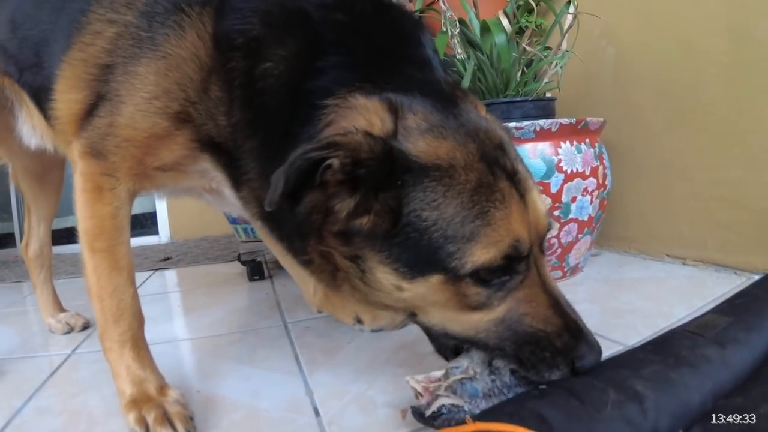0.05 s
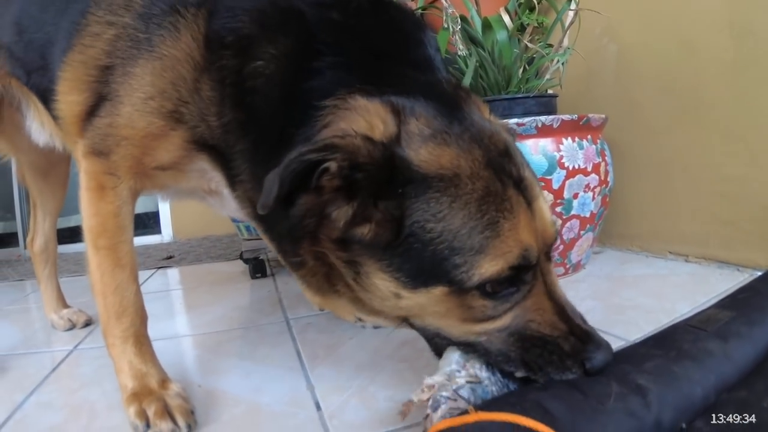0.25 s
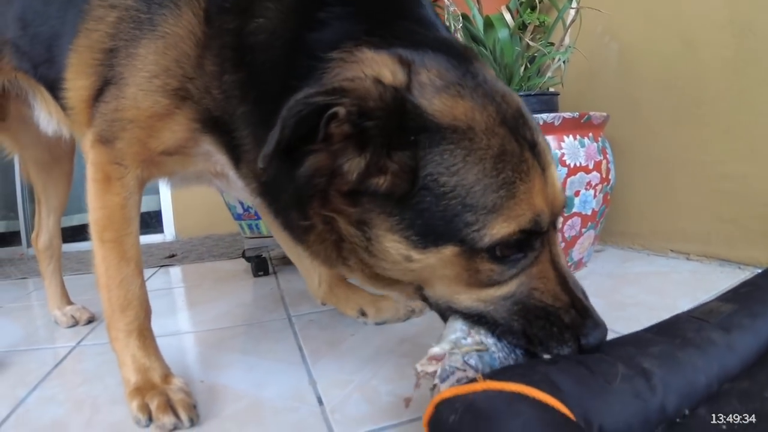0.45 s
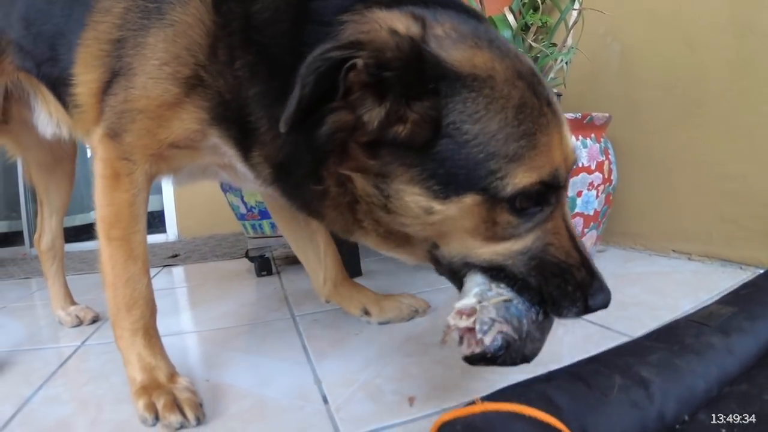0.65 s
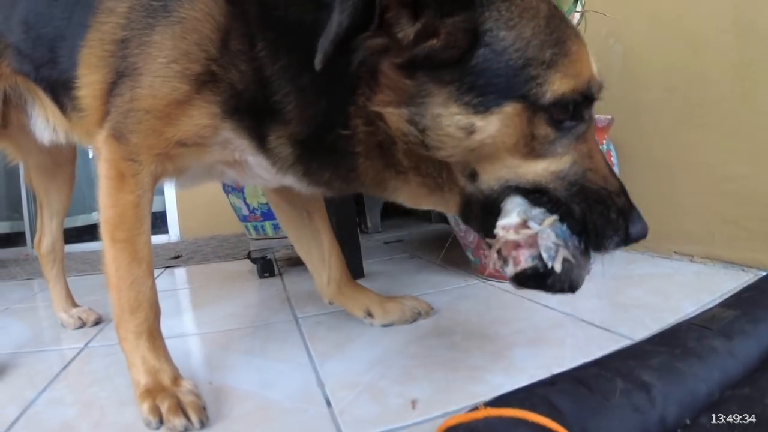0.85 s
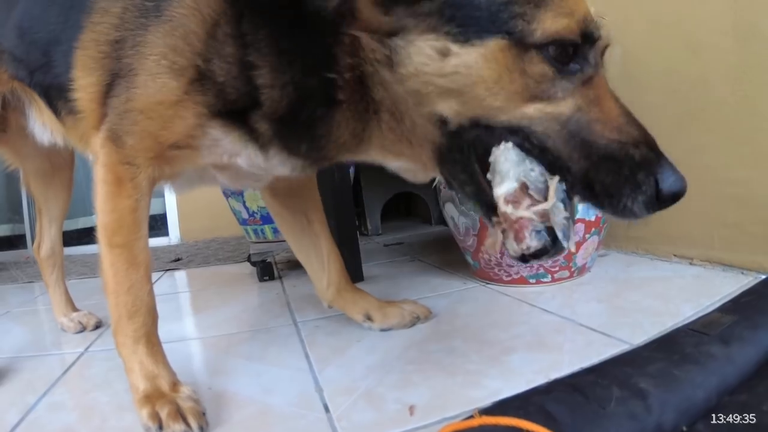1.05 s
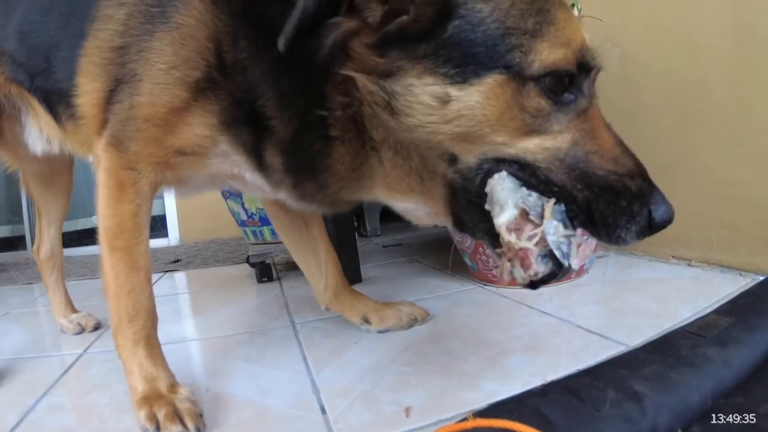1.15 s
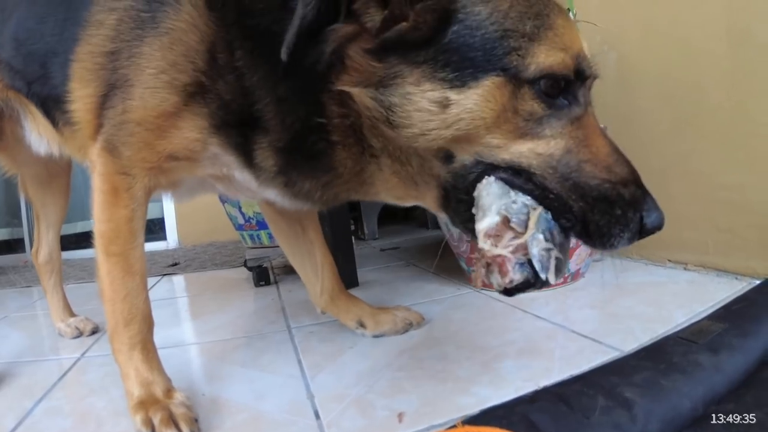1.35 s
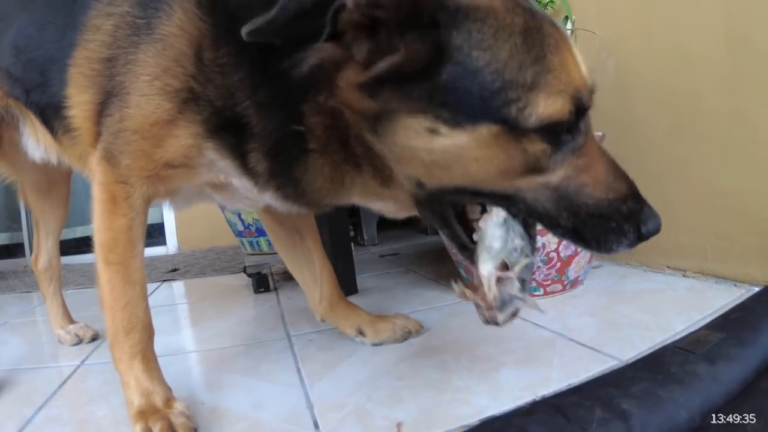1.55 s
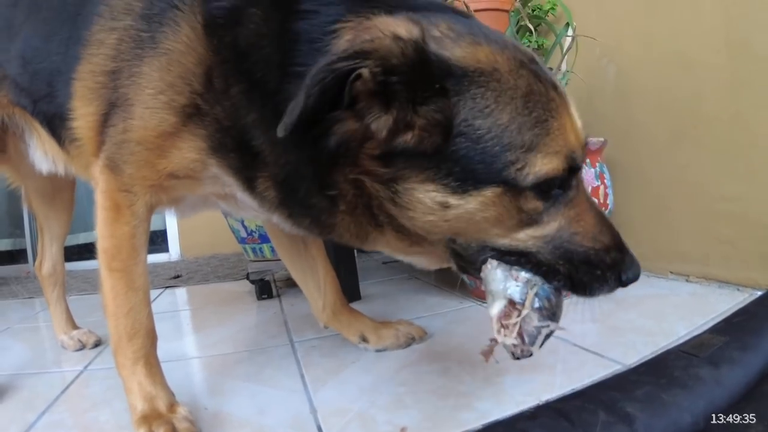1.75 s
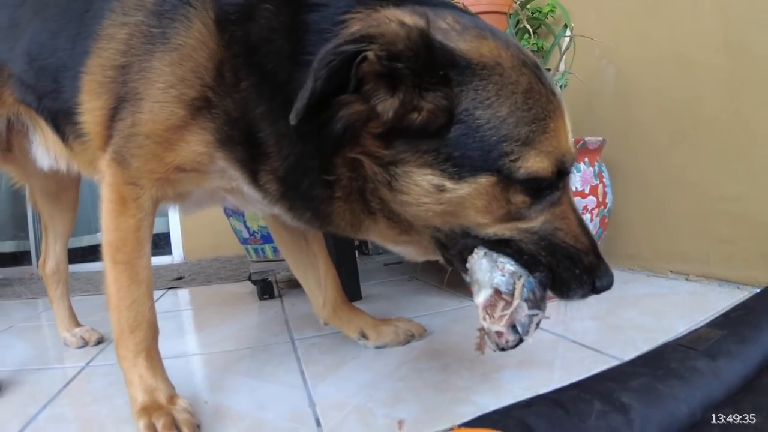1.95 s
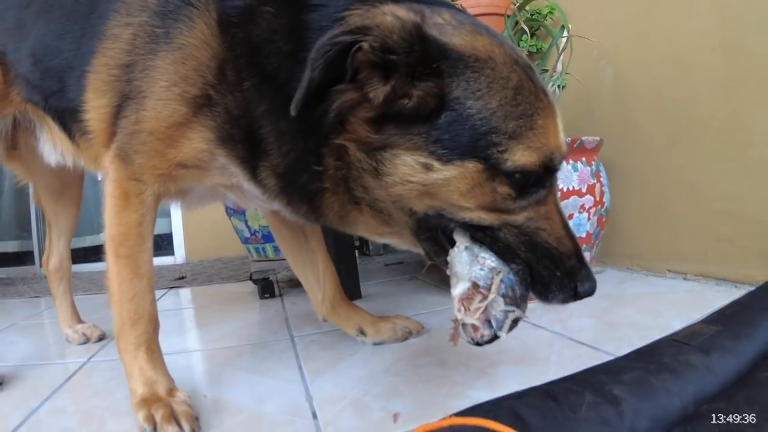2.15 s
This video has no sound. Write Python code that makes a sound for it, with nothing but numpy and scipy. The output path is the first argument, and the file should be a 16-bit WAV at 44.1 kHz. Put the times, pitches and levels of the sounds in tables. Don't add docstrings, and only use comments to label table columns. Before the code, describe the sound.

A dog crunches raw fish very close. Small wet ticks lead to loud, splintering bone cracks at 0.25, 0.39 and 0.46 s, then fibrous tearing around 0.5-0.6 s ending in dull jaw thuds. A lighter crack comes at 0.92, a faint falling wheeze and nasal hiss near 1.1, squelches around 1.4, hard crunches at 1.78 and 1.89, then smacks. Short patio echoes, faint low hum.

```python
import sys
import numpy as np
from scipy import signal
from scipy.fft import rfft, irfft, next_fast_len
from scipy.io import wavfile
from scipy.ndimage import map_coordinates

SR = 44100
rng = np.random.default_rng(int(sys.argv[2]) if len(sys.argv) > 2 else 0)


def int16_out(signal):
    q = np.round(np.clip(np.atleast_2d(signal).T, -1, 1) * 32767)
    wavfile.write(sys.argv[1], SR, q.astype(np.int16))


def volts_from_decibels(level):
    exponent = np.asarray(level, float) / 20
    return 10 ** exponent


N = 97020


def unit(x):
    return x / np.sqrt(np.mean(x ** 2) + 1e-20)


def clock(seconds_part):
    return np.arange(SR // seconds_part) / SR


def sine(hz, t):
    return np.sin(2 * np.pi * hz * t)


def along(points, hz):
    point_hz, value = np.transpose(points)
    return np.interp(np.log(hz + 1), np.log(point_hz + 1), value)


def curves(rows):
    s, *columns = np.transpose(rows)
    return [np.interp(np.arange(N) / SR, s, column) for column in columns]


def wobble(knots_per_s):
    knots = rng.standard_normal(int(N * knots_per_s / SR) + 4)
    return map_coordinates(knots, [np.arange(N) * knots_per_s / SR])


def filtered(x, response):
    size = next_fast_len(len(x) + 8192)
    return irfft(rfft(x, size) * response(np.fft.rfftfreq(size, 1 / SR)), size)[:len(x)]


def noise(tone, size):
    return unit(filtered(rng.standard_normal(size), lambda f: volts_from_decibels(along(tone, f))))


def resonance(centre_hz, width_hz):
    return lambda f: 1j * f * width_hz / (centre_hz ** 2 - f * f + 1j * f * width_hz)


def rough_ring(size, centre_hz, width_hz, order=1):
    return unit(filtered(rng.standard_normal(size), lambda f: resonance(centre_hz, width_hz)(f) ** order))


def shape(t, rise, hold, t60):
    return (1 - np.exp(-t / rise)) * volts_from_decibels(-60 * np.maximum(t - hold, 0) / t60)


def add(track, s, x):
    part = track[round(s * SR):][:len(x)]
    part += x[:len(part)]




def whistle(rows, width_hz):
    hz, db = curves(rows)
    band = unit(filtered(rng.standard_normal(N), lambda f: 1 / (1 + (f / width_hz) ** 2)))
    stray_hz = hz * (1 + 0.03 * wobble(30))
    carrier = np.sin(2 * np.pi * np.cumsum(stray_hz) / SR)
    return volts_from_decibels(db + 2.5 * wobble(45.1)) * band * carrier


# delay_s, level_db
WALL_ECHOES = [
    (.0115, -17),
    (.0178, -10),
    (.025, -14),
    (.033, -15),
]
# frequency_hz, t60_s
PATIO_T60 = [(200, 0.33), (800, 0.43), (2000, 0.32), (6000, .17), (14000, 0.18)]
# frequency_hz, level_db
PATIO_TONE = [(200, -2.5), (800, -6.5), (2000, -4), (6000, 0.5), (14000, 0)]


def patio(x, wet_db=0):
    wall_top_hz, tail_db, gap_s, build_s = 1200, -9, 0.003, 0.0064
    hz, t, grains = signal.stft(rng.standard_normal(SR // 3), SR, nperseg=256)
    decay_db = along(PATIO_TONE, hz)[:, None] - 60 * t / along(PATIO_T60, hz)[:, None]
    tail = signal.istft(grains * volts_from_decibels(decay_db), SR, nperseg=256)[1][:SR // 3]
    low = filtered(tail, lambda f: f < wall_top_hz)
    tail = tail - low * np.exp(-np.arange(len(tail)) / SR / build_s)
    tail = volts_from_decibels(tail_db) * np.pad(tail / np.linalg.norm(tail), (round(gap_s * SR), 0))
    walls = np.zeros(len(tail))
    for s, db in WALL_ECHOES:
        walls[round(s * SR)] = volts_from_decibels(db)
    answer = tail + filtered(walls, lambda f: 1 / (1 + 1j * f / wall_top_hz))
    return np.pad(x, (0, len(answer) - 1)) + volts_from_decibels(wet_db) * signal.fftconvolve(x, answer)


# frequency_hz, density_db
AIR_TONE = [(15, -64.5), (25, -31), (205, -8.5), (425, -13), (654, -17), (881, -15.5), (955, -20),
            (2200, -35.5), (15800, -35)]


def air():
    return volts_from_decibels(-43 - 5.5 + 1.25 * wobble(4.28)) * noise(AIR_TONE, size=N)


# frequency_hz, density_db
RUMBLE_TONE = [(8.8, -47), (15, -9), (49, -29), (86, -25), (100, -8), (130, -50), (220, -120)]


def rumble():
    return volts_from_decibels(-68.5) * noise(RUMBLE_TONE, size=N)


# pitch_hz, width_hz, level_db
HUM = [
    (123, 11.8, -54.5),
    (235.2, 37, -52),
]


def hum():
    return sum(volts_from_decibels(db) * rough_ring(N, hz, width_hz, order=2) for hz, width_hz, db in HUM)


# start_s, pitch_hz, level_db
NOSE = [
    (1.0, 6000, -75),
    (1.09, 6150, -46),
    (1.14, 6000, -48),
    (1.19, 6320, -54),
    (1.27, 6300, -62),
    (1.32, 6300, -82),
]


def nose():
    return whistle(NOSE, width_hz=350)


# start_s, pitch_hz, level_db
WHEEZE = [
    (1.04, 5022, -65),
    (1.1, 4500, -42.5),
    (1.15, 3650, -49.5),
    (1.24, 2605, -55),
    (1.31, 2300, -73),
]


def wheeze():
    return whistle(WHEEZE, width_hz=450)


# start_s, level_db
BREATH = [(0.0, -47.5), (0.15, -48.5), (0.27, -44.5), (0.42, -41), (0.48, -36), (0.63, -41.5), (0.7, -54),
          (0.91, -58.5), (1.08, -52.5), (1.26, -48.5), (1.32, -58.5), (1.38, -55.5), (1.45, -51.5),
          (1.6, -47), (1.82, -45), (1.97, -42), (2.1, -47.5), (2.2, -52)]
# frequency_hz, density_db
BREATH_TONE = [(290, -35), (500, -4.5), (621, -2), (707, -27.5), (794, -14.5), (1840, -12), (2250, -11),
               (5920, -12.5), (15800, -22.5)]


def breath():
    level_db, = curves(BREATH)
    return volts_from_decibels(level_db + 1.4 * wobble(26.28)) * noise(BREATH_TONE, size=N)


# start_s, level_db, rise_s, t60_s
SQUELCH = [
    (0.14, -33.5, 0.0051, 0.073),
    (0.633, -32, 0.0072, 0.043),
    (0.883, -36, 0.0048, 0.14),
    (0.927, -39, 0.0051, 0.44),
    (1.169, -41.5, 0.0088, 0.076),
    (1.09, -50.5, .01, 0.17),
    (1.404, -39.5, 0.0043, 0.17),
    (1.428, -34, 0.0043, 0.35),
    (1.621, -55, .005, 0.16),
    (2.089, -34.5, 0.011, 0.17),
]
# frequency_hz, density_db
WET_TONE = [(700, -4.5), (2000, -5.5), (4500, 1.5), (7000, -2), (9000, 2.5), (12000, -12.5), (16000, -9.5)]


def squelch():
    out, t = np.zeros(N), clock(4)
    for s, db, rise, t60 in SQUELCH:
        add(out, s, volts_from_decibels(db) * noise(WET_TONE, size=len(t)) * shape(t, rise, rise, t60))
    return out * volts_from_decibels(1.75 * wobble(150))


# start_s,
# level_db, pitch_hz, t60_s
RINGS = [(0, -53.5, 1595, 0.34), (.004, -53.5, 2130, 0.28), (.07, -51, 894, .2), (0.151, -48, 1650, 0.14),
         (0.252, -24, 1001, 0.23), (.253, -27, 240.5, 0.17), (.254, -31.5, 644, 0.19),
         (.292, -33.5, 997, 0.17), (.393, -20.5, 773, 0.16), (.394, -25.5, 654, 0.29),
         (.395, -27, 326, 0.16), (.47, -23.5, 658, 0.15), (0.464, -34, 3176, 0.15), (0.469, -38, 388, 0.35),
         (.926, -48, 1050, 0.1), (1.443, -40.5, 4480, 0.11), (1.444, -38, 6630, .08),
         (1.446, -38, 1036, 0.072), (1.66, -54, 627, 0.33), (1.789, -25.5, 599, 0.17),
         (1.79, -36, 330, 0.18), (1.787, -30.5, 1879, 0.18), (1.892, -21.5, 465, 0.095),
         (1.892, -29, 387, .12), (1.94, -42.5, 463, 0.35), (.388, -12, 490, 0.036),
         (0.402, -16.5, 423, 0.071), (.463, -19, 486, 0.041), (.247, -19.5, 2850, 0.024),
         (1.784, -20.5, 2957, 0.042), (.146, -38, 893, 0.035), (.69, -36, 189, 0.32)]


def rings():
    out, t = np.zeros(N), clock(5)
    for s, db, hz, t60 in RINGS:
        rough = rough_ring(len(t), hz, 38 + 0.17 * hz, order=2)
        add(out, s, volts_from_decibels(db) * (sine(hz, t) + 1.6 * rough) * shape(t, 0.0014, 0, t60))
    return out


# start_s, effort_db
TEAR = [
    (0.5, -29),
    (0.514, -33),
    (0.523, -24.5),
    (0.571, -21.5),
    (0.585, -24.5),
    (0.594, -36.5),
    (0.6, -29.5),
]
# frequency_hz, density_db
TEAR_TONE = [(120, -47), (200, -11), (621, -4), (964, -6), (1120, -5), (2400, -18.5), (3160, -26.5),
             (11200, -28), (15800, -40)]


def tearing():
    pops_per_s, scatter_db, burst_s = 890, 11, 0.0009
    split_hz, low_hiss, high_hiss_db = 3000, 0.5, -6.5
    onset = [(TEAR[0][0] - 0.02, -70)]
    release = [(TEAR[-1][0] + 0.058, -45), (TEAR[-1][0] + 0.25, -80)]
    effort_db, = curves(onset + TEAR + release)
    luck = rng.random((2, N))
    pops = (luck[0] < pops_per_s / SR) * volts_from_decibels(-scatter_db * np.log(luck[1] + 0.1))
    bursts = unit(signal.lfilter([1], [1, -np.exp(-1 / (burst_s * SR))], pops))
    sound = noise(TEAR_TONE, size=N)
    low = filtered(sound, lambda f: 1 / (1 + (f / split_hz) ** 4))
    high = unit(sound - low)
    return volts_from_decibels(effort_db) * (unit(low * (low_hiss + bursts)) + volts_from_decibels(high_hiss_db) * high)


# start_s, peak_db, pitch_hz
THUDS = [(0.105, -29.5, 383), (.131, -19, 297), (0.17, -30, 308), (.247, -11, 284), (.388, -8.5, 428),
         (.4635, -7, 455), (0.607, -16.5, 244), (.604, -7.5, 493), (0.6008, -7, 234), (0.612, -13, 427),
         (0.739, -35, 177), (.8895, -28.5, 750), (.897, -31, 850), (.881, -31, 246), (0.921, -20.5, 293),
         (1.784, -8.5, 280), (1.8885, -25.5, 313)]


def thuds():
    out, t = np.zeros(N), clock(20)
    for s, db, hz in THUDS:
        blow = -volts_from_decibels(db) * sine(hz, t) * shape(t, 0.00022, 1.225 / hz, 2.45 / hz)
        add(out, s, patio(blow, wet_db=-0.5))
    return out


# frequency_hz, density_db
FIZZ_TONE = [(300, -32), (1500, -1.5), (4000, 4.5), (8000, -2), (12000, -8.5), (16000, -55)]


def fizz(size):
    return noise(FIZZ_TONE, size)


# start_s, peak_db, pitch_hz, fizz_db
TICKS = [(0.026, -40.5, 3830, 7), (0.0646, -37, 1930, -1), (.103, -39.5, 1600, -6), (.132, -39, 1800, -7),
         (0.142, -25, 1880, -5), (.147, -22, 1670, -3.5), (0.604, -18, 2050, -31), (0.7097, -33, 1690, -8),
         (0.7118, -32, 5180, -9), (.816, -38.5, 8740, -19), (0.884, -24.5, 12650, -3.5),
         (1.2138, -27.5, 2440, -1.5), (1.222, -26.5, 2600, -8), (1.3841, -41.5, 2420, -2),
         (1.4248, -24, 5050, 5.5), (1.436, -27.5, 4260, 6), (0.918, -33, 1510, 12), (1.628, -36, 3900, -3),
         (1.5906, -35, 1750, -2), (1.989, -30, 9080, -14), (2.038, -31.5, 1960, -5),
         (2.0773, -28.5, 2130, -5), (2.1028, -15.5, 2033, -13), (2.11, -28.5, 10700, -5.5),
         (2.1802, -33, 5240, -17)]


def ticks():
    out, t = np.zeros(N), clock(20)
    for s, db, hz, fizz_db in TICKS:
        ring = 0.86 * rough_ring(len(t), hz, 250 + 0.057 * hz) + sine(hz, t)
        snap = (ring + volts_from_decibels(fizz_db) * fizz(len(t))) * shape(t, 0.00048, 0.00059, 0.02)
        add(out, s, patio(volts_from_decibels(db - 4.5) * snap, wet_db=-7))
    return out


# start_s, peak_db, pitch_hz
SPLINTERS = [(.2463, -4, 2397), (.2495, -8, 2000), (.3905, -8, 820), (.248, -5, 4350), (.3774, -14, 3840),
             (.3879, -4, 4000), (.389, -10, 2030), (.3879, -2.5, 5890), (.463, -9, 3150),
             (.9222, -15.5, 2140), (.9225, -23, 4250), (.9225, -11.5, 1200), (.388, -7.5, 3000),
             (1.888, -13, 1150), (1.888, -14.5, 750), (.5218, -22, 1330), (.5308, -22, 1460),
             (.5375, -25, 1330), (.545, -16.5, 580), (.55, -21, 730), (.563, -20.5, 660), (.577, -17, 830),
             (.583, -17, 1200), (.6145, -21, 910), (.922, -10.5, 7820), (1.4207, -23, 2060),
             (1.7826, -1.5, 1724), (1.7826, -6, 2630), (1.786, -11.5, 1857), (1.783, -8.5, 4880),
             (1.888, -8, 2080), (1.888, -12.5, 3650)]


def splinters():
    out, t = np.zeros(N), clock(20)
    for s, db, hz in SPLINTERS:
        t60 = 0.0082 * (2000 / hz) ** 0.54
        ring = sine(hz, t) * shape(t, 0.000077, 2.3 / hz, t60)
        add(out, s, volts_from_decibels(db) * patio(ring, wet_db=-6.5))
    return out


# start_s, peak_db, body_hz, fizz_db, length_s
CRACKS = [
    (0.2466, 3, 814, -12, 0.0037),
    (0.3776, -4, 573, -15.5, 0.0028),
    (0.3876, 4.5, 451, -19, 0.0019),
    (.4630, -3, 604, -14, 0.0042),
    (0.922, -13.5, 1197, -4.5, .002),
    (1.4195, -18.5, 1050, -20, 0.002),
    (1.7825, 2, 510, -10.5, 0.0017),
    (1.8892, -1.5, 440, -14, 0.0029),
]


def cracks():
    out, t = np.zeros(N), clock(20)
    for s, db, body_hz, fizz_db, length in CRACKS:
        rough = rough_ring(len(t), 1.15 * body_hz, 1.2 * body_hz)
        tone = np.sin(2 * np.pi * body_hz * t * (0.923 + 28 * t))
        body = (0.35 * rough - tone) * shape(t, 0.00018, length, 0.009)
        spray = fizz(len(t)) * shape(t, 0.00022, 0.92 * length, 0.02)
        rupture = rough_ring(len(t), 6500, 11000, order=2) * shape(t, 0.0001, 0.00056, 0.002)
        burst = spray + 1.24 * rupture
        add(out, s, patio(volts_from_decibels(db - 5) * (body + volts_from_decibels(fizz_db + 0.5) * burst)))
    return out


def scene():
    mouth = breath() + wheeze() + nose()
    dog = mouth + squelch() + rings() + tearing() + thuds() + ticks() + splinters() + cracks()
    low_hz = 165
    dog = filtered(dog, lambda f: (1j * f / (low_hz + 1j * f)) ** 2)
    return (air() + rumble() + hum() + dog)[None]


def low_pass(x):
    return signal.sosfilt(signal.butter(12, 16510, fs=SR, output="sos"), x)


def record(dry):
    ceiling, top_hz = 0.98, 16400
    clipped = dry / (1 + np.abs(dry / ceiling) ** 6) ** (1 / 6)
    mix = filtered(clipped[0], lambda f: f < top_hz)[None]
    return low_pass(mix)


dry = scene()
out = record(dry)
int16_out(out)
```